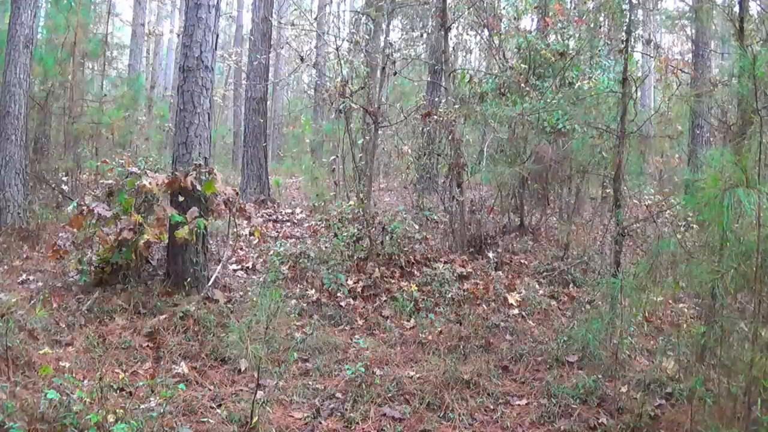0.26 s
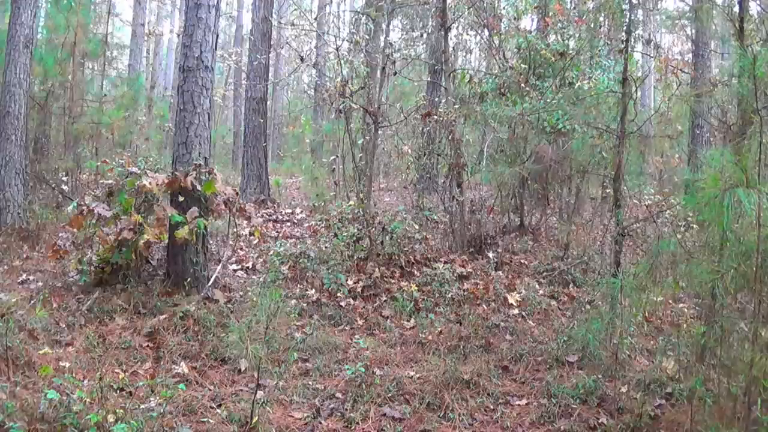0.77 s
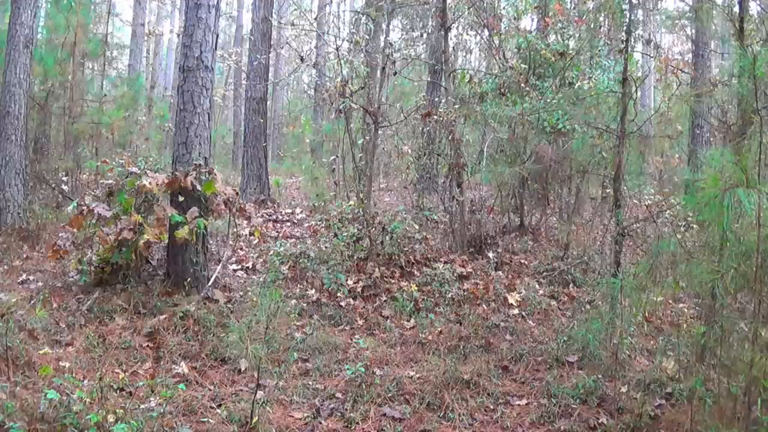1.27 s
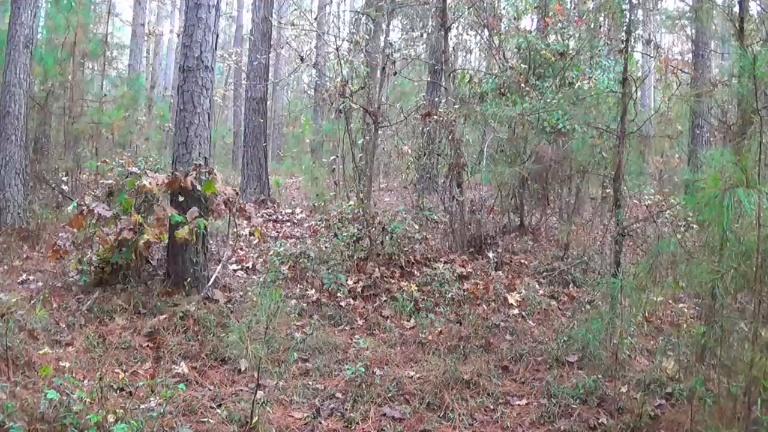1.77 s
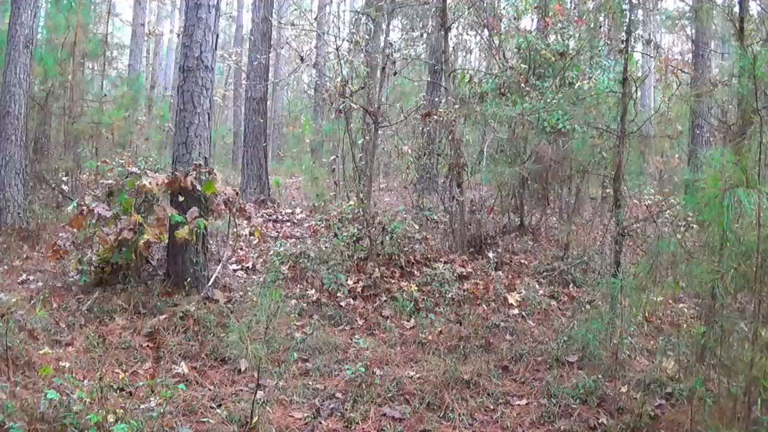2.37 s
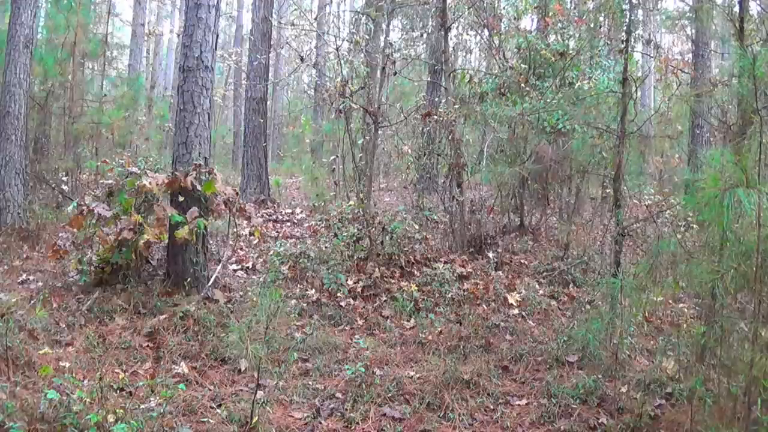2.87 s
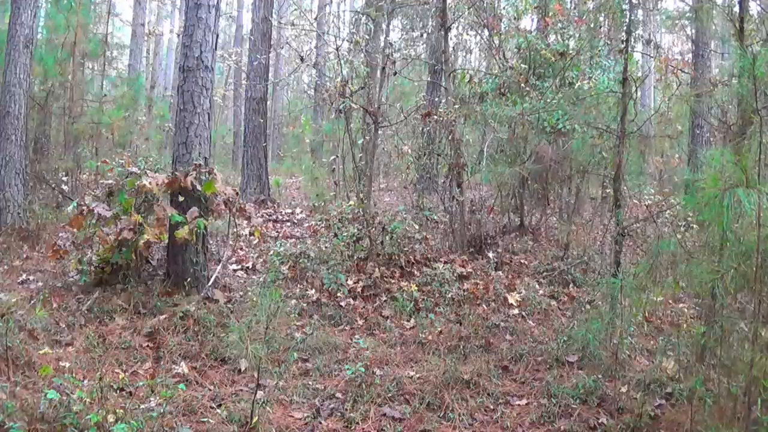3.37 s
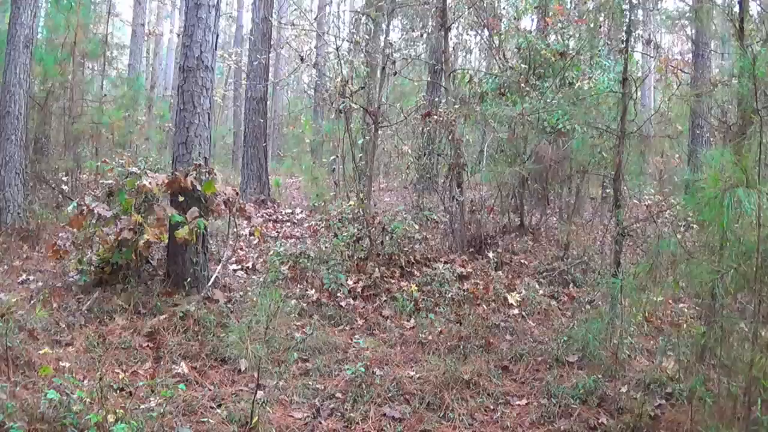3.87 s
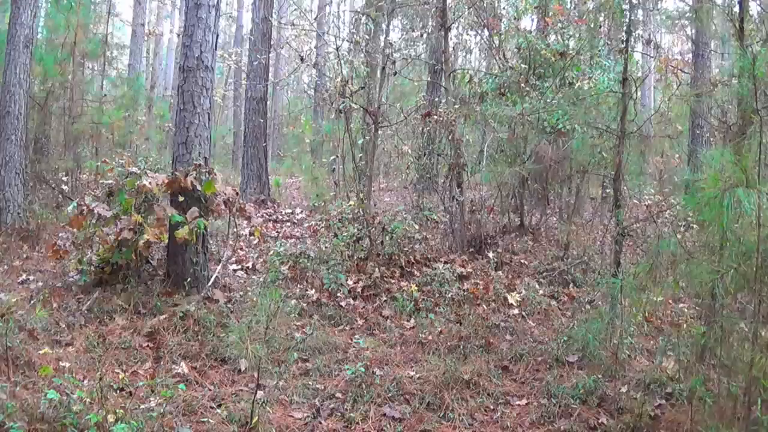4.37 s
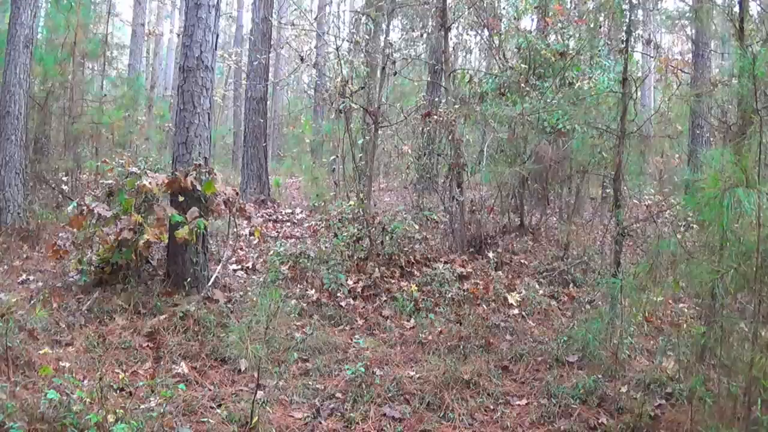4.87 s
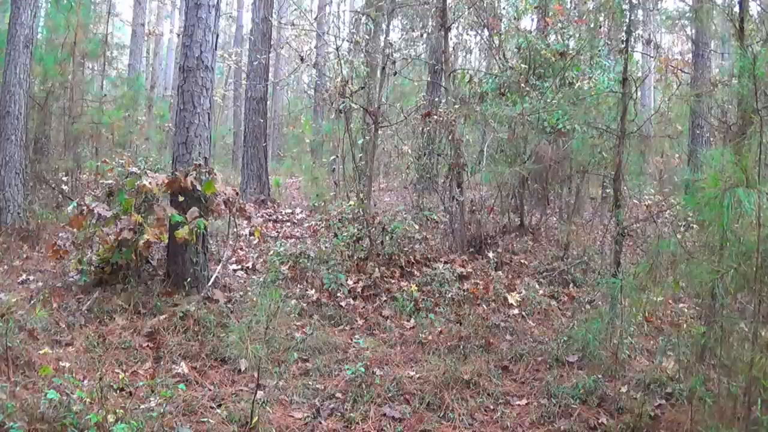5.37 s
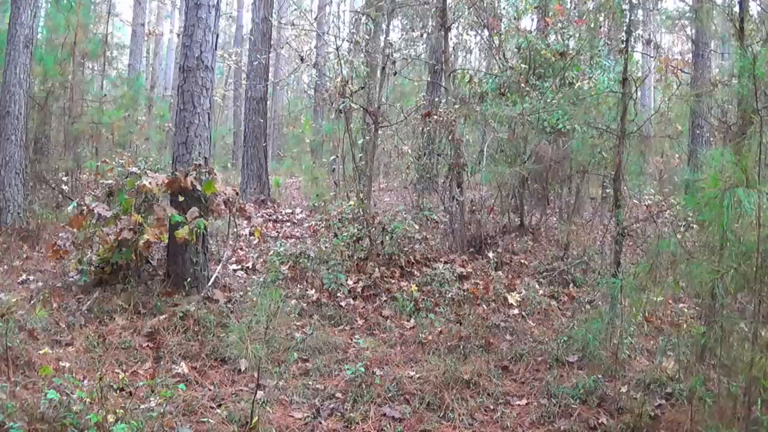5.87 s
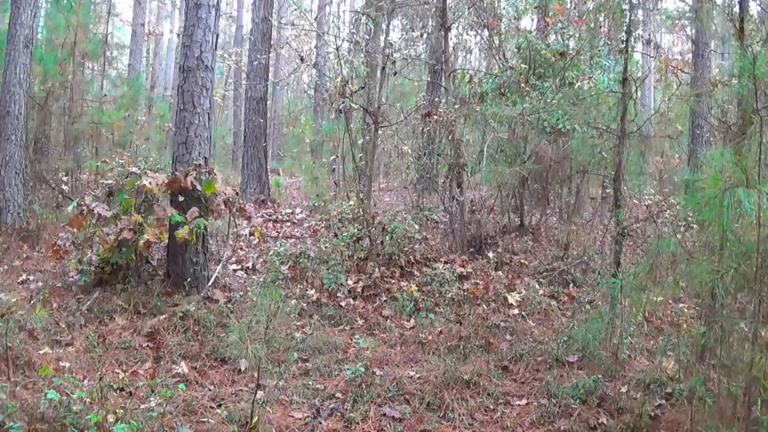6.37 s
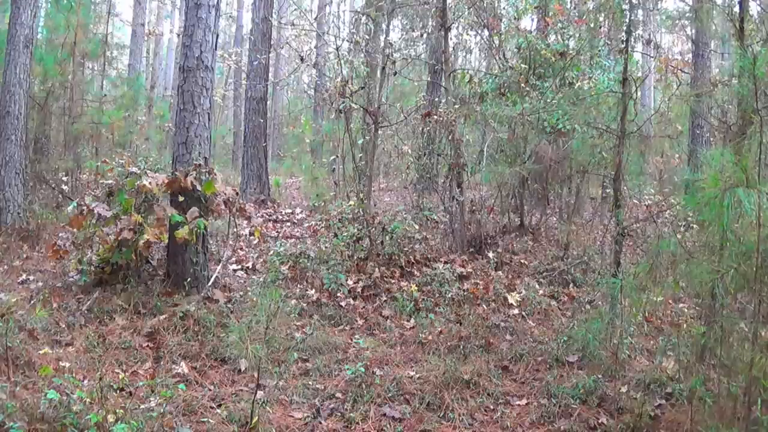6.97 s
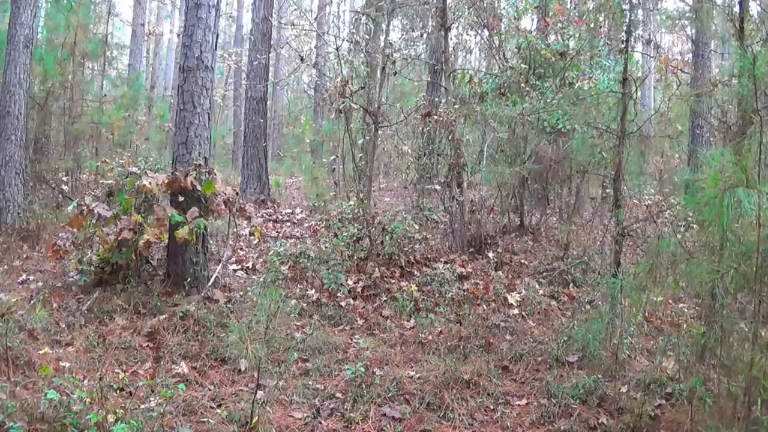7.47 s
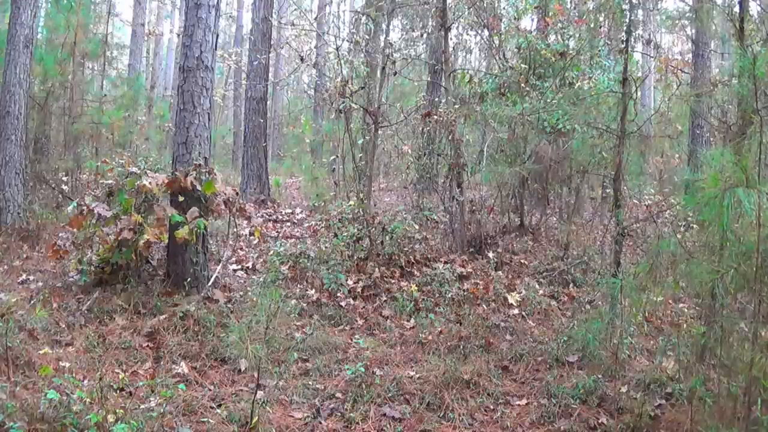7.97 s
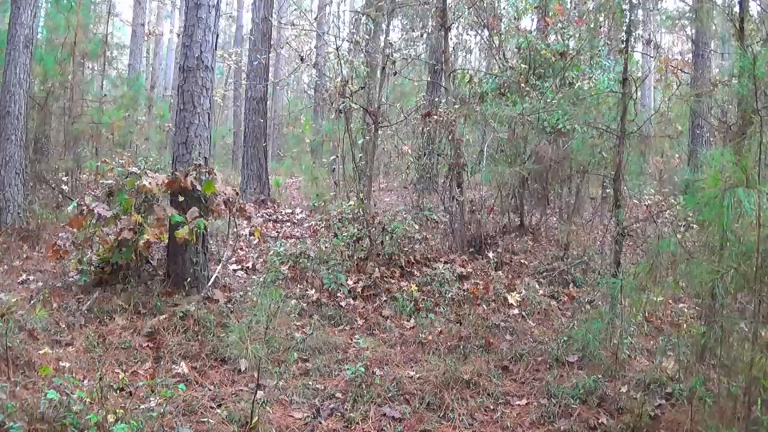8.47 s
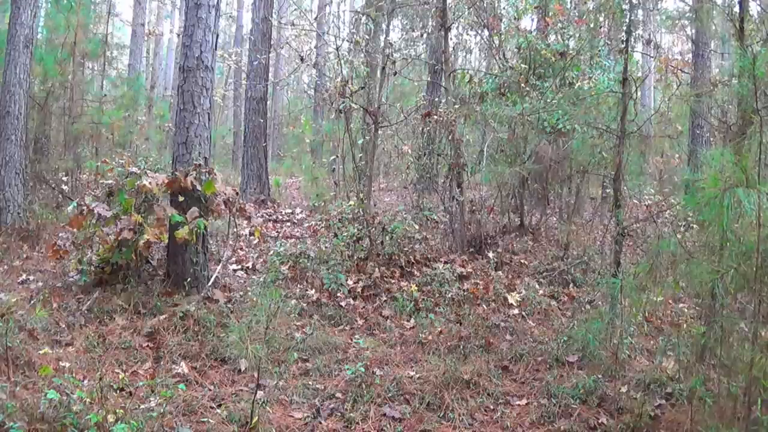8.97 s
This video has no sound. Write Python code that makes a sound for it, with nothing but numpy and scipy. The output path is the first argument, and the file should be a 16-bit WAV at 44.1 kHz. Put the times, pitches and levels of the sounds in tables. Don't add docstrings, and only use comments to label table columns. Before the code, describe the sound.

A hunting hound yelps and bays in short, sharp cries that echo through quiet pine woods, distant dogs howling faintly, leaves and cloth rustling close by.

```python
import sys
import numpy as np
from scipy import signal
from scipy.fft import rfft, irfft, next_fast_len
from scipy.io import wavfile
from scipy.ndimage import uniform_filter1d

SR = 44100
rng = np.random.default_rng(int(sys.argv[2]) if len(sys.argv) > 2 else 0)


def master_out(mix):
    frames = np.transpose(np.atleast_2d(mix))
    ceiling = np.clip(frames, -1, 1)
    pcm = np.round(ceiling * 32767).astype(np.int16)
    wavfile.write(sys.argv[1], SR, pcm)


def volts(x):
    e = np.asarray(x, float) / 20
    return 10 ** e


N = 406602


def rms_one(x):
    return x / np.sqrt(np.mean(x ** 2) + 1e-20)


def in_time(rows, t):
    s, *columns = np.transpose(rows)
    return [np.interp(t, s, column) for column in columns]


def at_hz(points, hz):
    points_hz, points_db = np.transpose(points)
    return np.interp(np.log(hz), np.log(points_hz), points_db)


def band_pass(x, order, low_hz, high_hz):
    return signal.sosfilt(signal.butter(order, [low_hz, high_hz], "band", fs=SR, output="sos"), x)


def wobble(rate_hz, size):
    settle = 4000
    pole = np.exp(-2 * np.pi * rate_hz / SR)
    noise = rng.standard_normal(size + settle)
    return rms_one(signal.lfilter([1], [1, -2 * pole, pole * pole], noise)[settle:])


def coloured(spectrum, size, alike):
    padded = next_fast_len(size, True)
    mid, side = rfft(rng.standard_normal((2, padded)))
    hz = np.arange(1, len(mid) + 1) * SR / padded
    likeness = np.clip(alike(hz), -1, 1)
    pair = np.sqrt(1 + likeness) * mid + np.sqrt(1 - likeness) * side * [[1], [-1]]
    return rms_one(irfft(pair * volts(at_hz(spectrum, hz)), padded)[:, :size])


# frequency in Hz, left-right likeness from 0 to 1.
LIKENESS = [(25, .97), (60, 1), (125, 1), (250, 0.66), (500, 0.59), (950, 0.73), (2400, 0.64), (5000, .68),
            (8000, 0.74), (12000, 0.94)]


def ports(hz):
    return at_hz(LIKENESS, hz)


# start in seconds, length in seconds, pitch in Hz, level in dB, brightness in dB.
WAILS = [(4.835, 0.12, 1173, -23, -1)]
CLIMBS = [(2.073, 0.038, 1270, -30.5, -4.5)]
YIPS = [(2.118, 0.018, 1077, -30, 12.5), (2.54, 0.016, 1248, -18.5, 1), (4.257, 0.044, 1133, -37.5, 17),
        (5.12, 0.02, 1204, -26.5, -4), (5.138, 0.013, 1035, -22, 0.0), (5.571, 0.03, 1188, -22, 4),
        (6.308, 0.012, 1033, -25.5, 7), (6.322, 0.019, 1188, -25.5, -11), (6.341, 0.02, 1192, -23.5, -8),
        (7.696, 0.042, 1216, -28, 4.5)]
BAYS = [(2.16, 0.068, 696, -40, 7.8), (2.582, 0.078, 697.6, -32, 7.3), (3.088, 0.076, 722.8, -32, 10.5),
        (3.635, 0.071, 687.4, -36, 8.6), (6.385, 0.071, 690.5, -32, 0.68), (7.758, 0.08, 697, -34, 2.5)]
GROWLS = [(2.556, 0.036, 629, -32, -2), (3.06, 0.042, 599, -30, -0.5), (3.578, 0.062, 618, -32, -4.5),
          (5.136, .024, 642, -30.5, -5), (5.594, 0.0377, 621.6, -31.5, 3.5), (7.72, 0.0444, 612, -36.5, -1)]
MOANS = [(2.1, 0.0687, 637.5, -35, 0), (6.348, 0.0498, 629.8, -30.5, -2)]
GRUNTS = [(4.305, 0.061, 560, -34, 2.5), (4.39, 0.058, 627.4, -32.5, -5)]
LOW_HOWLS = [(0, 0.71, 648, -73, -11), (.575, 0.088, 532.4, -63.5, 0.5), (.7, 0.13, 562, -66.5, -2.5),
             (.82, 0.18, 566.6, -67, -2), (1.19, 0.101, 538.7, -62.5, 9), (1.3, 0.48, 569.7, -61.5, -4.5),
             (1.48, 0.21, 673, -80, 16.5), (6.9, 0.56, 558, -67, 1.5), (8.08, 0.83, 623, -69, 5),
             (7.95, 0.66, 723, -69.5, -18), (8.6, 0.7, 552, -72.5, 2), (0, 0.41, 554, -76.5, -0.5)]
HIGH_HOWLS = [(.675, 0.15, 1220, -57, 1), (.86, 0.22, 1196, -60.5, 0), (1.13, 0.56, 908, -66.5, -1),
              (1.55, 0.47, 1190, -55, -1), (8.44, 0.15, 1174, -53.5, 1), (8.61, .29, 1192, -57.5, -5),
              (8.9, 0.4, 1204, -59, -6)]
CHIRPS = [(6.128, .03, 4520, -50, 0)]
WAIL = [(0, .66, .1), (.1, .71, .14), (.18, .75, .2), (.22, .99, .08), (.55, 1, .1), (.78, 1.01, .03),
        (1, .85, .3)]
CLIMB = [(0, .78, .2), (.4, .86, .1), (.8, 1, .05), (1, 1.01, 0)]
YIP = [(0, .97, .05), (.3, 1, .05), (.7, 1, .08), (1, .95, .1)]
BAY = [(0, .9, .1), (.22, .94, .02), (.5, 1, .02), (.62, .99, .02), (.78, .89, .1), (1, .79, .35)]
GROWL = [(0, 1.04, .95), (.4, 1, .95), (1, .98, .7)]
MOAN = [(0, 1.07, .3), (.5, 1.02, .08), (1, .98, .2)]
GRUNT = [(0, 1, .6), (.3, 1.01, .1), (.6, 1, .4), (1, .95, .3)]
HOWL = [(0, 1, .15), (.25, 1.01, .15), (.7, 1, .15), (1, .98, .2)]
CHIRP = [(0, .96, 0), (.4, 1, 0), (1, 1.01, 0)]
# cries, shape, effort along the shape in dB, harmonics 2 to 4 in dB,
# share of the brightness above harmonic 2, left over right in dB, echo in dB, pitch wander as a ratio.
KINDS = [
    (WAILS, WAIL, (-12, -1.5, -8, -0.5, 1.5, -4, 2), (-4.5, -15, -35), 0.26, -2, 0.0, 0.011),
    (CLIMBS, CLIMB, (-8, -5.5, -4.5, -25), (0.0, -0.68, -17), 1.7, -1.7, 0.0, 0.013),
    (YIPS, YIP, (4.5, -1, -3.5, 5), (-9.5, -30, -35), .05, -2, 0.0, 0.014),
    (BAYS, BAY, (1, -3.5, 1, -5, -4, 2.5), (0.0, -6.5, -17), 0.91, 0.26, 0.0, 0.0096),
    (GROWLS, GROWL, (0.92, 0.0, -1.5), (0.0, 0.0, -19), 0.79, -1.1, 0.0, 0.01),
    (MOANS, MOAN, (0.0, -3, 0.0), (0.0, 0.83, -11.5), 3.6, -0.99, 0.0, 0.0045),
    (GRUNTS, GRUNT, (6, -3, -11.5, 0), (0.0, -23, -12), 1.53, -0.5, 0.0, 0.0082),
]
FAR_KINDS = [
    (LOW_HOWLS, HOWL, (5, 0, -9, 5.5), (0.0, -10, -10.5), 1, 0.98, 14.6, 0.0304),
    (HIGH_HOWLS, HOWL, (6.5, -3.5, -1.5, 0.5), (-11, -14, -39), .9, 1, 12.4, 0.0237),
    (CHIRPS, CHIRP, (-13, 0.0, -12), (-42, -47, -60), 0.0, 0.0, -3, 0.0075),
]
# time in seconds, pitch in Hz, level in dB, growl from 0 to 1,
# mouth opening in dB.
FIRST_YELP = [(2.605, 762, -38, 0.2, -3), (2.624, 971, -26.5, .25, 0.5), (2.632, 1309, -28.5, 0.14, 1),
              (2.658, 1217, -27.5, 0, 9), (2.668, 1211, -17.5, 0, -10.5), (2.687, 1225, -19, .08, -15.5),
              (2.703, 1145, -21, 0.04, 2), (2.714, 1130, -22, .03, -9), (2.726, 970, -26, 0.2, -4)]
SECOND_YELP = [(3.043, 833, -32, 0.061, 8), (3.066, 905.7, -26.5, 0.37, -2), (3.074, 1318, -23.5, .1, -1),
               (3.094, 1225, -14, 0.017, -1), (3.108, 1248, -23, 0.087, -3.5),
               (3.132, 1245, -29, 0.52, 2.5), (3.138, 1120, -17.5, 0.065, -1),
               (3.15, 1025, -27.5, 0.055, 0), (3.158, 1020, -24, .1, 15)]
THIRD_YELP = [(3.553, 826, -25, .15, 0), (3.571, 941, -22.5, 0.41, -3), (3.58, 1293, -22.5, 0.093, 1),
              (3.6, 1194, -12, 0.018, -6.5), (3.622, 1262, -31, 0.054, -13),
              (3.637, 1214, -17.5, 0.055, -12), (3.643, 1115, -19.5, 0.054, 1.5),
              (3.649, 1080, -16.5, 0.028, -7.5), (3.664, 1025, -33, 0.14, 2)]
LEAD_CLIMB = [(3.978, 703, -26, 0.16, -4), (4.0, 751, -26, .1, 0.5), (4.015, 860, -27, 0.074, 6),
              (4.028, 889, -28, .2, 3.5), (4.036, 862, -35, 0.27, 0)]
LEAD_GRUNT = [(4.027, 564, -37, 0.58, 7), (4.046, 552, -32.5, .1, 14.5), (4.06, 548, -36, 0.26, 17.6),
              (4.072, 521, -35.5, 0.22, 12), (4.084, 510, -42, .3, 6.7)]
PURE_BAY = [(5.134, 664, -36, 0.42, -8), (5.15, 648, -21, 0.078, -16), (5.166, 622, -26, .02, -8),
            (5.196, 700, -25.5, 0.0096, -3), (5.214, 682, -36, 0.018, 8), (5.228, 564, -31, 0.055, -2),
            (5.243, 537, -34, 0.17, 2)]
BRIGHT_BAY = [(5.62, 612, -18, 0.14, 2), (5.636, 672.5, -41, 0.015, 16.4), (5.655, 681, -40, 0.0065, 20.7),
              (5.672, 692, -40.5, 0.0095, 20), (5.679, 659, -42, 0.046, 6), (5.69, 614, -26, 0.34, 3.6),
              (5.697, 580, -35, .8, 4.8), (5.706, 540, -37, .6, 2)]
# course, harmonics 2 to 4 in dB, left over right in dB.
LEADS = [
    (FIRST_YELP, (1.5, -10.5, -21.5), -2.5),
    (SECOND_YELP, (-4.5, -7.5, -17.5), -2.5),
    (THIRD_YELP, (-2.5, -11, -13.5), -1.5),
    (LEAD_CLIMB, (-2, -4.5, -20), -1.75),
    (LEAD_GRUNT, (-1.85, -6, -7.5), -0.49),
    (PURE_BAY, (0.0, -8.5, -20), -1),
    (BRIGHT_BAY, (0.0, -11.5, -20), -0.91),
]


def calls():
    sung = [(rows, overtones_db, pan_db, 0, 0.004) for rows, overtones_db, pan_db in LEADS]
    for cries, shape, effort_db, overtones_db, upper, pan_db, echo_db, wander in KINDS + FAR_KINDS:
        share, ratio, growl = np.transpose(shape)
        for s, length, hz, level_db, bright_db in cries:
            mouth_db = 0 * growl
            rows = np.transpose([s + share * length, hz * ratio, np.add(effort_db, level_db), growl, mouth_db])
            colour_db = np.add(overtones_db, bright_db * np.array([1, upper, upper]))
            sung.append((rows, colour_db, pan_db, echo_db, wander))
    return sung


def pack():
    direct, sent = np.zeros((2, N)), np.zeros((2, N))
    for rows, overtones_db, pan_db, echo_db, wander in calls():
        pan = volts([[pan_db / 2], [-pan_db / 2]])
        voice = cry(overtones_db, rows, 0.018, wander, -30, 3.0) * pan
        start = round(rows[0][0] * SR)
        voice = voice[:, :N - start]
        at = slice(start, start + voice.shape[1])
        direct[:, at] += voice
        sent[:, at] += voice * volts(echo_db)
    head_toss = 1 + 0.5 * wobble(75, N)
    heard = direct + wood(sent * head_toss)
    treble = band_pass(heard, 1, 900, 6000)
    shaded = heard + 0.094 * treble * [[-1], [1]]
    return signal.sosfilt(signal.butter(8, 462, "high", fs=SR, output="sos"), shaded)


# frequency in Hz, gain in dB.
THROAT = [(500, 10), (1200, -2.5), (1700, 1.5), (2050, -4), (2450, -0.5), (2750, -8.5), (3250, -5.5),
          (3750, -7), (4200, -8.5), (4800, 1), (5400, -14.5), (9000, -1)]


def cry(overtones_db, rows, jitter, wander, breath_db, flutter_db):
    t = np.arange(rows[0][0], rows[-1][0], 1 / SR)
    size = len(t)
    pitch, level_db, growl, open_db = in_time(rows, t)
    growl = np.clip(growl, 0, 1)
    smooth_hz = uniform_filter1d(pitch, size=200)
    unsteady = jitter * (0.39 + growl) * wobble(147, size) + wander * wobble(21.3, size)
    phase = 2 * np.pi * np.cumsum(smooth_hz * (1 + unsteady)) / SR

    levels_db = [*overtones_db] + [overtones_db[-1] - 8.7 * k for k in range(1, 5)]
    upper = np.zeros(size)
    for k, harmonic_db in enumerate(levels_db):
        throat_db = at_hz(THROAT, (k + 2) * smooth_hz)
        swell_db = flutter_db * np.tanh(wobble(8.5, size))
        upper += volts(harmonic_db + throat_db + swell_db) * np.sin((k + 2) * phase + k)

    stress = 1 - 0.73 * growl + 2.23 * growl * np.cos(phase / 3)
    between = 0.46 * growl * np.sin(4 * phase / 3)
    teeth = np.diff(uniform_filter1d(rng.standard_normal(size + 1), size=4))
    hiss = volts(-33) * teeth * (1 + np.cos(phase))
    breath = 1 + volts(breath_db) * (1 + 1.5 * growl) * wobble(900, size)
    to_end_s = np.minimum(t - t[0], t[-1] - t)
    edge = np.sin(np.pi / 2 * np.clip(to_end_s / 0.007, 0, 1)) ** 2
    voice = np.sin(phase) + between + (upper * stress + hiss) * volts(open_db)
    return voice * breath * volts(level_db) * edge


# band centre in Hz, level in dB, time to fall by 60 dB in seconds.
WOOD = [(471, -1.5, 4.24), (710, -1.5, 2.8), (980, -4.5, 4.55), (1368, -1, 2.09), (1934, -3, 2.02),
        (2900, -2.5, 1.75), (3870, -11, 1.2), (6530, 14, 0.4)]


def wood(sent):
    size = 2 ** 17
    t = np.arange(size) / SR
    white = [coloured([(20, 0), (20000, 0.0039)], size, lambda hz: 0.68 + 0 * hz) for _ in range(2)]
    tail = np.zeros((2, size))
    for k, (hz, db, t60) in enumerate(WOOD):
        band = band_pass(white[k % 2], 2, hz / 2 ** 0.22, hz * 2 ** 0.23)
        slow = volts(-60 * t / t60)
        quick = volts(1.5 - 60 * t / (0.12 * t60))
        tail += band * volts(db) * (slow + quick)
    swell = 1 - np.exp(-t / 0.01)
    return signal.fftconvolve(sent, volts(-38) * tail * swell, axes=1)[:, :N]


# time in seconds, crisp level in dB.
RUSTLE = [(0.0, -64), (3.03, -56.5), (6.83, -54.5), (7.5, -41.5), (7.93, -52), (9.22, -58.5)]
# start in seconds, crisp level in dB, time to fall by 60 dB in seconds.
BRUSHES = [(0.638, -63.5, 0.5), (1.199, -62, 0.12), (1.7, -62, 0.34), (3.069, -71, 1), (3.567, -50, 0.41),
           (3.899, -68, 1), (4.927, -63, 1), (5.161, -53, 0.28), (5.917, -67, 0.62), (6.069, -71, 0.63),
           (6.349, -57.5, 0.29), (6.521, -60, 0.19), (6.711, -64, 0.39), (6.883, -64, 0.35),
           (6.958, -60, 0.24), (7.065, -64, 0.34), (7.178, -55, 0.54), (7.241, -53, 0.4),
           (7.354, -40, 0.42), (7.42, -44, 0.084), (7.543, -48, 0.76), (7.651, -61, 1), (7.83, -50, 0.096),
           (8.066, -64, 0.28), (8.13, -57.5, 0.38), (8.213, -63, 0.4), (8.271, -57.5, 0.39),
           (8.38, -76, 0.46), (8.62, -69, 0.29)]
# frequency in Hz, density in dB per Hz.
CRISP = [(5500, -38), (7000, -9.5), (8200, 3.5), (10000, 4), (12500, 2), (14000, -12.5), (16000, -8.5)]
DULL = [(700, -19), (1800, -6.5), (2600, -7.5), (4200, -4), (5400, -6), (6800, -12), (9000, -20)]


def rustle():
    t = np.arange(N) / SR
    moving_db = in_time(RUSTLE, t)[0]
    level = volts(moving_db - 8.5)
    for s, crisp_db, t60 in BRUSHES:
        at = slice(round(s * SR), round(s * SR) + SR)
        since = t[at] - s
        attack = np.clip(since / 0.0057, 0, 1)
        level[at] += volts(crisp_db - 60 * since / t60) * attack
    grain = volts(1.8 * wobble(45, N) + 1.4 * wobble(320, N))
    gentle_db = -55
    dull_db = 3.5 - 0.64 * np.maximum(moving_db - gentle_db, 0)
    dull = volts(dull_db) * coloured(DULL, N, ports)
    crisp = coloured(CRISP, N, lambda hz: 0.99 + 0 * hz)
    return grain * level * (crisp + dull)


# time in seconds, peak level in dB, dull minus crisp level in
# dB.
TICKS = [(0.1062, -35, -15), (0.6485, -29, 0), (1.2034, -24.5, -3), (1.703, -31, -6), (3.901, -31, -23),
         (5.1651, -26.5, 3), (6.065, -34, 4), (6.3198, -32, 1), (6.3542, -37, -8), (6.7103, -41, -8),
         (6.8886, -31, -10), (6.9575, -34, -6), (7.064, -37, -20), (7.18, -30, -6), (7.2284, -27, -8),
         (7.243, -20, -9), (7.279, -17.5, -13), (7.358, -24, -11), (7.5305, -9, -48), (7.6305, -16.5, -9),
         (7.686, -32, -9), (7.8291, -27.5, 3), (8.001, -34, 5), (8.012, -36, 13.5), (8.0612, -41, -8),
         (8.2712, -33, -6)]


def ticks():
    size = 300
    crisp, dull = np.zeros(N), np.zeros(N)
    decay = np.exp(-np.arange(size) / 76.0)
    for s, peak_db, dull_db in TICKS:
        burst = rng.standard_normal(size) * decay
        at = slice(round(s * SR), round(s * SR) + size)
        crisp[at] += volts(peak_db - 4.5) * burst
        dull[at] += volts(peak_db + dull_db - 4.5) * burst
    return band_pass(crisp, 2, 8900, 12700) + band_pass(dull, 2, 950, 5200)


# frequency in Hz, density in dB per Hz.
HUSH = [(200, -30), (400, 0.5), (1000, 7.5), (1900, 4.5), (3500, -2.5), (5250, 0.5), (6200, -4.5),
        (13300, -14), (16000, 4)]


def hush():
    return volts(-56.5) * coloured(HUSH, N, ports)


# time in seconds, level in dB.
RUMBLE = [(0.0, -61.5), (1.39, -60.5), (2.8, -55.5), (5.11, -58), (5.72, -56.5), (9.22, -59.5)]
# frequency in Hz, density in dB per Hz.
DRONE = [(12, -34), (25, -8.5), (70, -5), (103, -1), (150, 2), (192, -6.5), (250, -3), (330, -7),
         (500, -12.5), (900, -21)]


def far_drone():
    level_db = in_time(RUMBLE, np.arange(N) / SR)[0]
    return volts(level_db) * coloured(DRONE, N, ports)


def scene():
    steady = pack() + rustle() + hush() + far_drone()
    top_cut = signal.cheby2(12, 60, 16100, fs=SR, output="sos")
    return signal.sosfilt(top_cut, steady) + ticks()


def band_limit(x):
    return signal.sosfilt(signal.butter(12, 16650, fs=SR, output="sos"), x)


def record(dry):
    steep_cut = signal.cheby2(12, 60, 16650, fs=SR, output="sos")
    mix = signal.sosfilt(steep_cut, dry)
    return band_limit(mix)


dry = scene()
out = record(dry)
master_out(out)
```